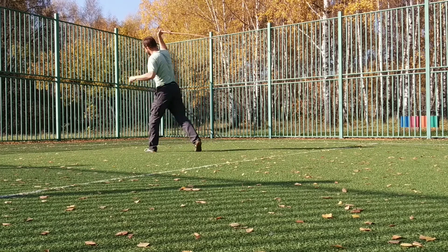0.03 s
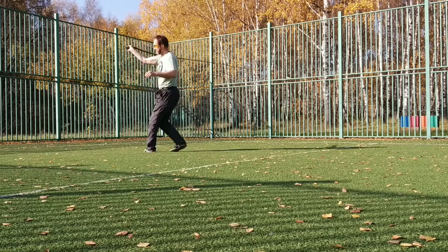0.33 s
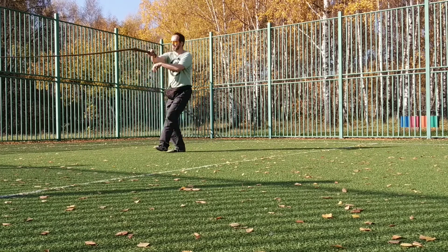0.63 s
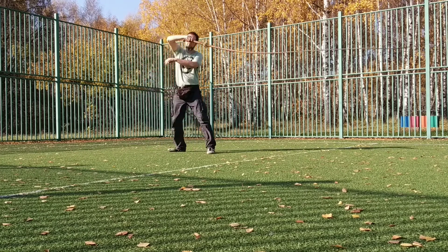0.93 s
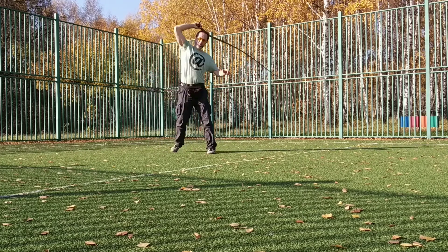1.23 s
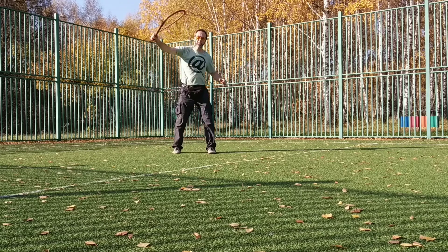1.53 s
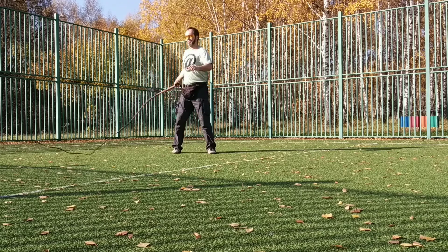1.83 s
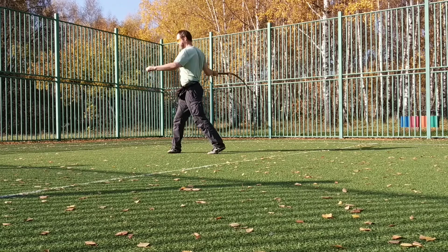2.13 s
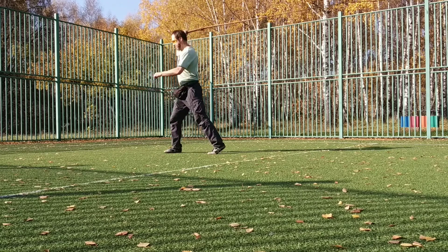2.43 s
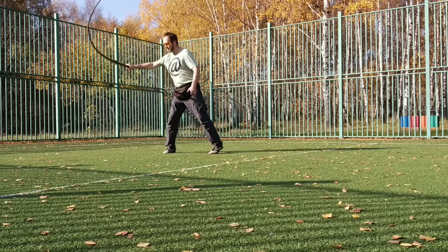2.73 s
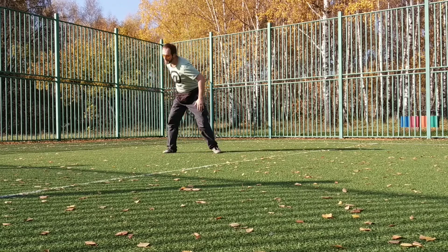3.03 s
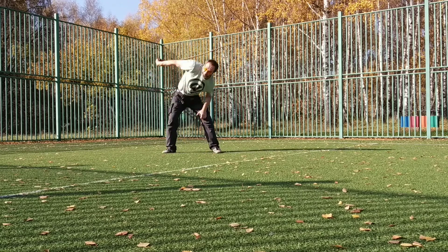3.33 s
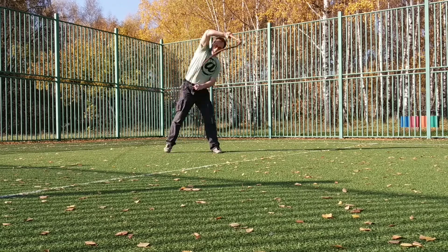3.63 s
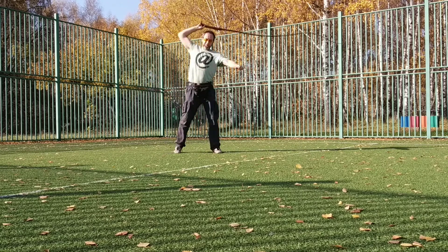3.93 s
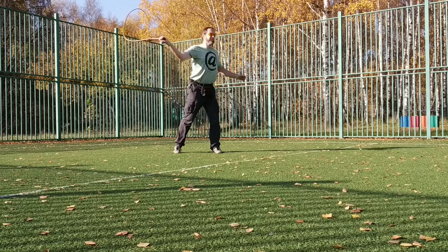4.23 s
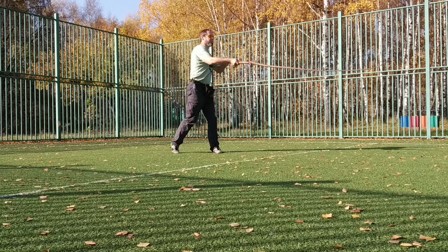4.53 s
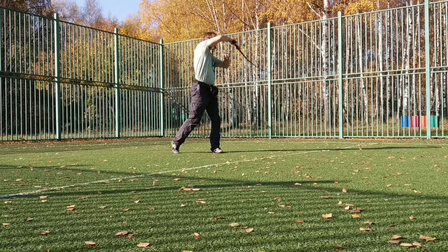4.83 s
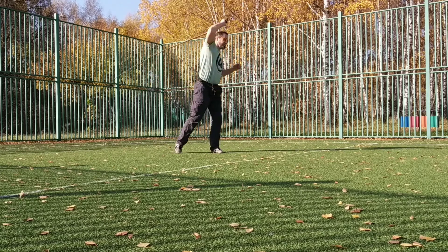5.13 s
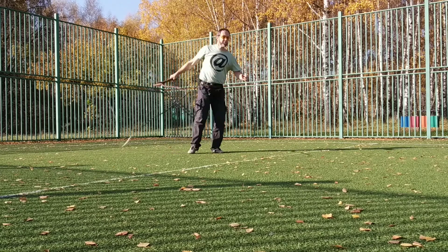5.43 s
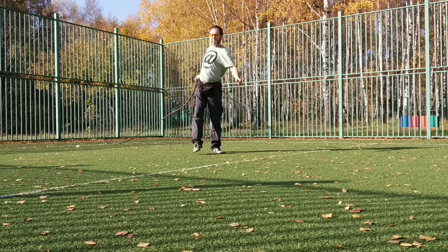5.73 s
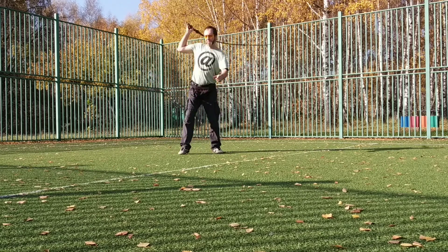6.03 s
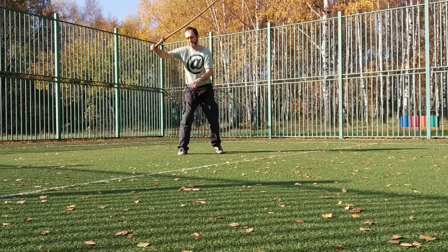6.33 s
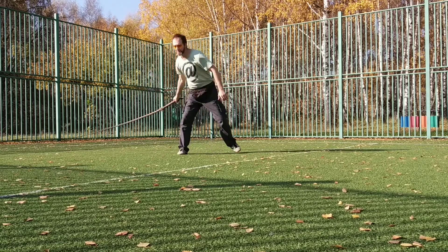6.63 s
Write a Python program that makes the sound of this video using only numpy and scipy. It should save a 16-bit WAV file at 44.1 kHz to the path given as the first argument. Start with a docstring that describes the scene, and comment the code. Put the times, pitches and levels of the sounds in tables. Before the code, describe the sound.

A faint, low rumble of distant traffic runs throughout on an outdoor field. A long leather whip swishes softly, close on the left, around 0.5 and 0.8 seconds. At 1.7 seconds it cracks sharply, overloading the microphone with a slight thud. Quick slaps and brief falling trills come back from a steel fence, and a bright wash fades over about a second. A whoosh with a soft flick passes at 3 seconds, a lighter swish follows, and a second crack lands at 3.6 seconds with a distant echo. Around 4.4 to 4.5 seconds the whip whistles by with two light snaps. The third hard crack comes at 5.4 seconds, again distorting briefly and echoing off the fence. A last hissing whoosh and soft flick at 6.5 seconds trail into a faint swish. A few quiet scuffs on turf fall between the swings.

```python
"""A sports field ringed by steel bars, a town rumbling far off, the near fence about 3.6 m away.
Just left of the microphone a long leather whip is swung. The thong hisses and whistles through the air;
slow throws end in a soft flick, three fast ones in a crack as the tip sheds shock waves.
The bars scatter each crack into slaps, falling trills and a long bright wash; trees answer later.
The hardest blasts overload the microphone."""
import sys
import numpy as np
from scipy import signal
from scipy.fft import rfft, irfft
from scipy.io import wavfile
from scipy.ndimage import uniform_filter1d

SR = 44100
rng = np.random.default_rng(int(sys.argv[2]) if len(sys.argv) > 2 else 0)


def master(y):
    """Save y as 16-bit WAV."""
    cut = np.clip(np.atleast_2d(y).T, -1, 1)
    pcm = np.round(cut * 32767)  # scale
    wavfile.write(sys.argv[1], SR, pcm.astype(np.int16))


N = 303408
TIME = np.arange(N) / SR


def amp(db):
    """Decibels to gain."""
    return 10 ** (np.asarray(db) / 20)


def unit(x):
    """Scales to rms 1."""
    return x / np.sqrt(np.mean(x ** 2) + 1e-20)


def read(points, hz):
    """Reads (freq_hz, value) points on a log-frequency axis."""
    freqs, values = np.transpose(points)
    return np.interp(np.log(hz + 1), np.log(freqs + 1), values)


def pan(side_db):
    """Left and right gains; side_db is left minus right throughout."""
    return amp(np.array([[side_db], [-side_db]]) / 2)


def add(mix, start_s, sound):
    """Mixes a stereo sound in at start_s."""
    part = mix[:, round(start_s * SR):][:, :sound.shape[1]]
    part += sound[:, :part.shape[1]]


def wander(hz, size):
    """Smooth random motion of rms about 1, rolling off above hz."""
    freqs = np.fft.rfftfreq(N, 1 / SR)
    return unit(irfft(rfft(rng.standard_normal(N)) * np.exp(-(freqs / hz) ** 2), N))[:size]


def ripple(size, width):
    """Random bumps of rms 1, smoothed twice over width points."""
    return unit(uniform_filter1d(uniform_filter1d(rng.standard_normal(size), width), width))


def swell(t, rise_s, fall_s):
    """Grows towards t = 0 and dies after it."""
    return np.exp(-np.where(t < 0, -t / rise_s, t / fall_s))


# How much of a left-right level difference the microphone picks up: freq_hz, share
MIC_SHADOW = [(400, 0.015), (1500, 0.28), (2500, 0.073), (4500, 1), (8000, 1), (13000, 0.49)]

def noise(colour, likeness, size, side_db=0):
    """Stereo noise of rms 1 with a given spectrum, left-right likeness and lean to one side."""
    hz = np.fft.rfftfreq(size, 1 / SR)
    left, other = rfft(rng.standard_normal((2, size)))
    same = np.clip(read(likeness, hz), -1, 1)
    right = same * left + np.sqrt(1 - same ** 2) * other
    gain = amp(read(colour, hz)) * pan(side_db) ** read(MIC_SHADOW, hz)
    return unit(irfft(np.array([left, right]) * gain, size))


# Traffic far beyond the field: freq_hz, level_db
TOWN_SPECTRUM = [(18, -9), (40, 2), (52, -6), (65, 3), (85, -7), (150, -12), (280, -23), (750, -25),
                 (1200, -31), (2800, -37.5), (6500, -39), (10500, -46), (16000, -57)]
# How alike it reaches the two sides of the microphone: freq_hz, correlation
TOWN_CORRELATION = [(30, 0.96), (300, 1), (1000, 0.11), (3000, 0.0065)]
# One distant engine: time_s, level_db
ENGINE_LEVELS = [(0.1, -55), (.45, -43.5), (0.86, -36), (1.15, -51), (1.55, -43.5), (2.0, -59),
                 (3.1, -52.5), (3.8, -40.5), (4.1, -49.5), (4.7, -46), (5.6, -43.5), (6.8, -46.5)]

def town(level_db=-36, surge_db=1.2, engine_hz=144.8, climb_hz_per_s=0.75, left_lag_s=0.00026):
    """Far traffic to the right heaves under a steady hiss; an engine drones in and out, gathering speed."""
    bed = noise(TOWN_SPECTRUM, TOWN_CORRELATION, N, side_db=3) * amp(level_db)
    rumble = signal.sosfiltfilt(signal.butter(2, 220, fs=SR, output="sos"), bed)
    pitch_hz = (engine_hz + climb_hz_per_s * TIME) * (1 + 0.004 * wander(5.1, N))
    phase = 2 * np.pi * np.cumsum(pitch_hz) / SR
    drone = unit(np.sin(phase) + amp(-19) * np.sin(2 * phase))
    engine = drone * amp(np.interp(TIME, *np.transpose(ENGINE_LEVELS)))
    heave = rumble * (amp(surge_db * wander(17, N)) - 1)
    left, right = bed + heave + engine
    return np.array([np.roll(left, round(left_lag_s * SR)), right])


# Echoes from far beyond the fence: peak_s, level_db, rise_s, fall_s, centre_hz
DISTANT_ECHOES = [(1.945, -29, 0.1, 0.016, 2740), (3.897, -24.5, 0.045, 0.047, 2600),
                  (3.911, -33.5, 0.036, 0.16, 910), (5.605, -28, .04, 0.026, 2150)]

def far_echoes(grain_db=1.5):
    """Distant walls and trees send each crack back as a dull, grainy swell."""
    out, size = np.zeros((2, N)), 32768
    t = (np.arange(size) - size // 2) / SR
    for s, db, rise, fall, hz in DISTANT_ECHOES:
        colour = [(hz / 6, -24), (hz / 2, -6), (hz, 0), (hz * 2.3, -9), (hz * 4, -40)]
        echo = noise(colour, [(500, 0.34), (2000, 0.088)], size)
        grain = unit(amp(grain_db * wander(200, size)))
        add(out, s + t[0], amp(db) * echo * grain * swell(t, rise, fall))
    return out


# Shoes and thong brushing the turf, centred: peak_s, level_db, rise_s, fall_s, centre_hz
TURF_SCUFFS = [(0.395, -49, 0.015, 0.05, 1610), (1.812, -23, 0.0014, 0.0057, 290),
               (2.084, -36, 0.0055, 0.0085, 377), (3.118, -43, 0.011, 0.019, 740),
               (3.14, -44, 0.006, 0.003, 1400), (4.785, -46, 0.03, 0.028, 2500),
               (6.685, -42, 0.023, 0.024, 910)]

def scuffs(grain_db=3):
    """Blades of turf and dry leaves slip in small clumps."""
    out, size = np.zeros((2, N)), 8192
    t = (np.arange(size) - size // 2) / SR
    for s, db, rise, fall, hz in TURF_SCUFFS:
        colour = [(hz / 4, -14), (hz, 0), (hz * 1.46, -11), (hz * 5, -42)]
        rub = noise(colour, [(300, 0.77), (3000, 0.7)], size)
        grain = unit(amp(grain_db * wander(370, size)))
        add(out, s + t[0], amp(db) * rub * grain * swell(t, rise, fall))
    return out


def trill(length_s, first_hz, last_hz, waver=0.065):
    """Echoes of neighbouring bars merge into a brief ringing tone that sinks as the angle flattens."""
    progress = np.arange(0, length_s, 1 / SR) / length_s
    jitter = unit(uniform_filter1d(rng.standard_normal(4096), 40))[:len(progress)]
    pitch_hz = last_hz + (first_hz - last_hz) * (1 - progress) ** 2
    phase = 2 * np.pi * np.cumsum(pitch_hz * (1 + waver * jitter)) / SR
    return unit(np.sin(phase) + amp(-12) * np.sin(2 * phase)) * np.sin(np.pi * np.sqrt(progress))


def stray_trills(size, count=110):
    """Faint trills from all round the field, scattered through the wash."""
    out = np.zeros((2, size))
    draws = rng.uniform([.04, .012, 0, .75, -12], [.7, .035, 2.6, .92, 12], (count, 5))
    for s, length, octave, sink, side_db in draws:
        hz = 1300 * 2 ** octave
        add(out, s, amp(-19) * pan(side_db) * trill(length, hz, sink * hz))
    return out


# Rows of bars on either side: start_s, length_s, first_hz, last_hz, level_db, side_db
FENCE_TRILLS = [(1.725, 0.018, 2340, 1480, -26, -2), (1.749, 0.052, 2810, 2460, -29.5, 10),
                (1.773, 0.021, 4700, 4340, -22, 1), (1.793, .016, 4700, 3840, -22, -2),
                (3.612, 0.013, 1960, 1750, -24, -6), (3.627, 0.0091, 3110, 2250, -24.5, 5),
                (5.447, 0.014, 3590, 2300, -20.5, 1)]

def fence_trills():
    """The clearest trills off the bars, just after each crack."""
    out = np.zeros((2, N))
    for s, length, first_hz, last_hz, db, side_db in FENCE_TRILLS:
        add(out, s, amp(db) * pan(side_db) * trill(length, first_hz, last_hz))
    return out


SOUND_M_PER_S, NEAR_DELAY_S = 343, 0.021  # the delay is the round trip to the near fence
# Sharp slaps off the fence, near and far: peak_s, level_db, rise_s, fall_s, centre_hz, bass_db, side_db
FENCE_SLAPS = [(1.7455, -16.5, 0.00098, 0.0025, 9500, 6, 8), (1.754, -19.5, 0.0039, 0.028, 3600, -7, 8),
               (1.7635, -19, 0.0076, 0.0042, 10100, 3, 12), (1.7789, -10, 0.00063, 0.0014, 3830, 6, 11),
               (1.8502, -15, 0.0005, 0.007, 7750, -35, 1), (3.6042, -12, 0.002, 0.003, 8000, -4, -6),
               (3.6235, -11, 0.0035, 0.0083, 5340, -8, 13), (3.6245, -9, 0.0011, 0.0028, 11000, -16, 10),
               (3.704, -17, 0.0072, 0.0076, 6000, -9, 0), (5.418, -21, .001, .003, 6000, -8, 2),
               (5.4275, -10.5, 0.00065, 0.0009, 7500, -1, 14),
               (5.4462, -5.5, 0.00044, 0.0032, 4650, -0.5, 4),
               (5.4648, -11.5, 0.00072, 0.00062, 2820, 8, -2)]

def fence_slaps():
    """The fence throws back sharp slaps; a soft near-fence echo also follows every crack."""
    out = np.zeros((2, N))
    for s, *_ in FULL_CRACKS:
        add(out, *shock(s + NEAR_DELAY_S, db=-19, rise_s=0.0042, fall_s=0.022, centre_hz=2170,
                        hump_db=10.5, bass_db=-7, side_db=10))
    for *burst, bass_db, side_db in FENCE_SLAPS:
        add(out, *shock(*burst, hump_db=10.5, bass_db=bass_db, side_db=side_db, octaves=0.65))
    return out


def bars(crack_s, size, count=200, spacing_m=0.127, crooked=0.12, shade_m=5, reach_m=13, uneven_db=4):
    """Evenly spaced bars answer one after another, ever farther off: click trains that fall in pitch."""
    out = np.zeros((2, size))
    slap_paths = [(s - crack_s, 0, -5) for s, *_ in FENCE_SLAPS if 0 < s - crack_s < 0.1]
    for delay_s, db, side_db in [(NEAR_DELAY_S, 3, -12)] + slap_paths:
        distance_m = SOUND_M_PER_S * delay_s / 2
        along_m = spacing_m * (np.arange(count) + crooked * rng.standard_normal((2, count)))
        path_m = np.hypot(distance_m, along_m)
        # near bars shade one another, far ones fade, and no two answer equally
        strength = np.tanh(along_m / shade_m) * np.exp(-(along_m / reach_m) ** 2)
        strength *= amp(uneven_db * rng.standard_normal((2, count)))
        arrival = np.clip(np.round(2 * path_m / SOUND_M_PER_S * SR).astype(int), 0, size - 1)
        clicks = amp(db) * pan(side_db) * strength * distance_m / path_m
        np.add.at(out, (np.arange(2)[:, None], arrival), clicks)
    return out


def comb(echoes, depth_db=1.8):
    """The fronts of one crack interfere, and all its echoes carry the same fine peaks and notches."""
    spectrum = rfft(echoes)
    notches = unit(amp(depth_db * np.minimum(ripple(spectrum.shape[1], 45), 1)))
    return irfft(spectrum * notches, echoes.shape[1])


def wash_level(t, fence_db, delay_s, hold_s, trees_db, fence_db_per_s=74.5, trees_db_per_s=40):
    """The fence answers early, holds and drops fast; the trees behind it swell later and linger."""
    def attack(start_s, length_s):
        return np.clip((t - start_s) / length_s, 0, 1)
    onset_s = 0.0036
    near_fence = amp(-24) * attack(NEAR_DELAY_S - onset_s, onset_s)
    fence = np.maximum(near_fence, attack(delay_s, onset_s))
    fence *= amp(fence_db - fence_db_per_s * np.maximum(t - hold_s, 0))
    trees = attack(NEAR_DELAY_S, 0.44) * amp(trees_db - trees_db_per_s * t)
    return np.hypot(fence, trees)


# The wash at the microphone, colour_age_s after a crack: freq_hz, level_db
WASH_SPECTRUM = [(120, -29), (200, -10), (372, -17.5), (598, -4), (816, -7.5), (894, -0.5), (1180, -11.5),
                 (1630, -2), (2720, 4), (4140, -1.5), (6420, -3.5), (9780, -13), (13100, -34), (15000, -55)]
# How its balance shifts with age: freq_hz, change_db_per_s
WASH_DARKENING = [(200, 4), (900, 25.5), (2700, 22), (5000, 1), (8000, -10), (12000, -37), (16000, -88)]

def wash(crack_s, treble_side_db, colour_age_s=0.4561, drift_db_per_s=10, patchy_db=1.1):
    """Dense echoes of bars and trees at an even level; the air takes the top off as the paths lengthen."""
    size = round(1.4 * SR)
    echoes = bars(crack_s, size)
    echoes += amp(-17 + 0.28 * wander(1600, size)) * rng.standard_normal((2, size))  # diffuse scatter
    echoes /= np.sqrt(uniform_filter1d((echoes ** 2).mean(0), 1500))
    hz, age, spectra = signal.stft(comb(echoes + stray_trills(size)), SR, nperseg=512)
    # long waves reach both sides alike; short ones come mostly from the near fence on the left
    same = read([(300, 1.0), (1000, 0.0074)], hz)[:, None]
    spectra[1] = same * spectra[0] + np.sqrt(1 - same ** 2) * spectra[1]
    spectra *= pan(treble_side_db + drift_db_per_s * age) ** read(MIC_SHADOW, hz)[:, None]
    colour = amp(read(WASH_SPECTRUM, hz)[:, None] + read(WASH_DARKENING, hz)[:, None] * (age - colour_age_s))
    patches = unit(uniform_filter1d(uniform_filter1d(rng.standard_normal(colour.shape), 14, 0), 3, 1))
    spectra *= colour / np.sqrt(np.mean(colour ** 2, 0)) * amp(patchy_db * patches)
    return signal.istft(spectra, SR, nperseg=512)[1][:, :size]


# Cracks that set the whole fence off: start_s, fence_db, delay_s, hold_s, trees_db, treble_side_db
FULL_CRACKS = [(1.7038, -21, 0.084, 0.13, -22.5, 5.5), (3.5867, -17.5, 0.023, 0.16, -16.5, 3.5),
               (5.398, -18, 0.055, 0.2, -15.5, 4)]

def fence_washes(clump_db=1.15):
    """Each crack's wash dies away in clumps: posts and trunks return more than the gaps between them."""
    out = np.zeros((2, N))
    for s, *shape, side_db in FULL_CRACKS:
        tail = wash(s, side_db)
        size = tail.shape[1]
        clumps = amp(clump_db * wander(110, size))
        add(out, s, tail * wash_level(TIME[:size], *shape) * clumps)
    return out


def vortex(hz, breath_db, flutter_hz, waver=0.035):
    """Vortices peel off at a pitch that follows the speed; the taper smears the tone into a band."""
    size = len(hz)
    phase = 2 * np.pi * np.cumsum(hz * (1 + waver * wander(270, size))) / SR
    return unit(np.sin(phase) + amp(breath_db) * wander(flutter_hz, size) * np.cos(phase))


# The thong and its thin end turning over: middle_s, length_s, pitch_hz, glide_octaves_per_s, level_db
THONG_WHISTLES = [(0.853, 0.11, 958, -7, -51), (1.61, 0.052, 1093, -1, -48), (1.633, 0.05, 467, 4.5, -46.5),
                  (2.943, 0.04, 441, 2, -36.5), (3.322, 0.038, 967, 9, -50), (3.355, 0.014, 2200, -14, -47),
                  (3.591, 0.012, 4270, 94, -28), (4.379, .018, 1370, 8, -38),
                  (4.379, 0.021, 1690, 22, -34.5), (4.393, 0.015, 1600, -8, -33),
                  (4.421, 0.028, 650, 11, -37), (4.468, 0.026, 655, -8, -30.5),
                  (4.532, 0.0232, 510, -5, -36), (4.48, 0.041, 1137, -14.5, -42),
                  (4.549, 0.012, 1490, -7, -27.5), (4.569, 0.035, 1344, -5.5, -42.5),
                  (5.381, 0.014, 2560, 25, -28), (6.496, 0.03, 1750, 9, -41), (6.512, 0.011, 1450, 54, -29),
                  (6.494, 0.057, 455, 9, -42), (6.522, 0.014, 2080, 7, -35), (6.597, 0.14, 433, -2, -44)]

def whistles(side_db=5):
    """Brief, breathy vortex tones on the left, gliding as the whip gains or loses speed."""
    out = np.zeros((2, N))
    for s, length, hz, glide, db in THONG_WHISTLES:
        t = np.arange(-length / 2, length / 2, 1 / SR)
        tone = vortex(hz * 2 ** (glide * t), breath_db=-8, flutter_hz=284)
        add(out, s + t[0], amp(db) * tone * np.sqrt(np.hanning(len(t))) * pan(side_db))
    return out


# Air round the thin tip: freq_hz, level_db
TIP_HISS = [(200, -25), (1200, -5), (2700, -5.5), (4200, -1), (7000, 4), (9500, 2.5), (11500, -2),
            (13000, -14), (15700, -9)]
# Air round the thick thong: freq_hz, level_db
THONG_RUSH = [(100, 7.5), (500, 5.5), (1000, 1.9), (3000, -10), (8000, -49)]
# Passes left of the microphone: peak_s, hiss_db, rise_s, fall_s, rush_over_hiss_db, hum_hz
THONG_PASSES = [(.48, -52, 0.28, 0.095, -1, 493), (.805, -42.5, 0.12, 0.06, -3.5, 561),
                (1.385, -51.5, 0.038, 0.033, 9.5, 786), (2.925, -44, 0.066, .026, -10, 434),
                (2.967, -37.5, 0.023, 0.025, 1, 461), (3.134, -55.5, 0.09, 0.12, -1, 600),
                (3.351, -40.5, 0.029, 0.015, -3.5, 514), (4.437, -30, 0.034, 0.0033, -6.5, 726),
                (4.488, -32, 0.0246, 0.052, -0.5, 600), (6.525, -26, 0.026, 0.017, -4.5, 614),
                (6.572, -38, 0.023, 0.016, -4.5, 453), (6.714, -42, 0.055, 0.051, -6, 760)]

def swishes(side_db=9.5, linger_db=-26.5, linger_s=0.4, hum_lead_s=0.016, db_per_octave=25.5):
    """Turbulence: the tip hisses, the thick thong rushes lower down and hums higher the faster it goes."""
    hiss = noise(TIP_HISS, [(2000, 0.024)], N) * amp(wander(76, N))
    rush = noise(THONG_RUSH, [(300, 0.82), (2000, 0.14)], N) * amp(0.5 * wander(47, N))
    # one more pass as the loop races towards each crack
    run_ups = [(s - 0.0091, -31, 0.0245, 0.0089, -11, 544) for s, *_ in FULL_CRACKS]
    out, t = np.zeros((2, N)), np.arange(-SR // 3, SR // 3) / SR
    for s, db, rise, fall, rush_db, top_hz in list(THONG_PASSES) + run_ups:
        field_return = amp(linger_db) * swell(TIME - s, rise, linger_s)
        level = swell(TIME - s, rise, fall) + field_return
        out += amp(db) * level * (hiss * pan(side_db) + amp(rush_db) * rush)
        effort = swell(t, rise, fall)
        pitch_hz = top_hz * 2 ** (20 * np.log10(effort + 1e-9) / db_per_octave)
        hum = vortex(pitch_hz, breath_db=-10, flutter_hz=130)
        hum_db = db + rush_db - 6 + 0.13 * (db + 25)  # slow passes barely hum
        # the hum comes first: the wave runs through the thick thong before it reaches the tip
        add(out, s - hum_lead_s + t[0], amp(hum_db) * effort * hum * pan(0.83))
    return out


# The loop rolling out near the microphone: middle_s, peak_db, half_width_s, side_db
TIP_FLICKS = [(1.7056, -1, 0.00028, -11), (2.977, -18.5, 0.00043, 2.5), (3.5868, -17.5, 0.00073, -7),
              (4.4404, -18.5, 0.00053, -11.5), (4.5095, -16.5, 0.00036, 2), (6.5234, -20.5, 0.0015, 0),
              (6.5448, -14, 0.00063, 3)]

def flicks():
    """The turning tip pushes and pulls the air once: one pressure wave, in soft throws and cracks alike."""
    out = np.zeros((2, N))
    for s, db, half_width, side_db in TIP_FLICKS:
        offset = (TIME - s) / half_width
        out += amp(db) * pan(side_db) * 3 * offset / (1 + offset ** 2) ** 2
    return out


# Base colour of a shock at the microphone: freq_hz, level_db
SHOCK_SPECTRUM = [(60, -37), (250, 5), (1000, 2.5), (3000, -0.5), (7500, -4), (11000, -5), (16000, -15.5)]

def shock(s, db, rise_s, fall_s, centre_hz, hump_db, bass_db, side_db, octaves=0.56, ragged_db=2.5):
    """A brief burst of ragged pressure, lifted around centre_hz; returns its start time and sound."""
    size = 4096
    t = (np.arange(size) - size // 4) / SR
    hz = np.geomspace(40, 18000, 60)
    hump = np.exp(-(np.log2((hz + 1) / centre_hz) / octaves) ** 2)
    colour = read(SHOCK_SPECTRUM, hz) + hump_db * hump + bass_db / (1 + (hz / 1300) ** 2)
    burst = noise(np.transpose([hz, colour]), [(500, 0.61), (2000, 0.044)], size, side_db)
    fronts = amp(ragged_db * ripple(size, 16))
    level = swell(t, rise_s, fall_s)
    return s + t[0], amp(db) * unit(burst * fronts * level) * np.sqrt(np.mean(level ** 2))


# Direct sound of the tip: peak_s, level_db, rise_s, fall_s, centre_hz, hump_db, bass_db
TIP_SHOCKS = [(1.6945, -5, 0.0002, 0.0022, 10700, 10, -20), (1.7053, -1, 0.00088, 0.0025, 3020, 5.5, 2),
              (3.5854, -5, 0.0045, 0.0026, 5170, 6.5, -21), (4.4397, -8.5, 0.00057, 0.00072, 9900, 12, -36),
              (4.509, -20, 0.0006, 0.0036, 8100, 12, 2), (5.379, -20.5, 0.0033, 0.01, 2420, 8, -14),
              (5.392, -10, 0.0018, 0.0048, 10500, 1, -6.5), (5.3955, 0.5, 0.00025, 0.0011, 910, 5, -1.5)]

def cracks():
    """The tip sheds shock waves that reach the microphone straight from the left."""
    out = np.zeros((2, N))
    for row in TIP_SHOCKS:
        add(out, *shock(*row, side_db=6))
    return out


# Blasts that knock the microphone off its rest point: start_s, left_full_scale, right_full_scale
MIC_JOLTS = [(1.7051, 0.38, -0.9), (1.7774, 0.27, -0.17), (5.3959, -0.71, -0.63), (5.445, -0.23, -0.12),
             (5.4648, 0.083, -0.33)]

def jolts(rise_s=0.00016, settle_s=0.15, swing_hz=3.09, lead_rad=0.49):
    """The overloaded microphone jumps with a thud and swings slowly back to rest."""
    out, t = np.zeros((2, N)), np.arange(SR) / SR
    jump = (1 - np.exp(-t / rise_s)) * np.exp(-t / settle_s)
    swing = np.cos(2 * np.pi * swing_hz * t + lead_rad) / np.cos(lead_rad)
    for s, left, right in MIC_JOLTS:
        add(out, s, np.array([[left], [right]]) * jump * swing)
    return out


def scene():
    """The field as it reaches the microphone: whip, fence, turf and town."""
    whip = swishes() + whistles() + flicks() + cracks()
    return whip + fence_slaps() + fence_trills() + far_echoes() + scuffs() + town() + fence_washes()


def record(dry, edge_hz=15850):
    """The microphone jolts, clips at full scale and loses the treble above edge_hz."""
    clipped = np.clip(dry + jolts(), -1, 1)
    lowpass = signal.firwin(511, edge_hz, window=("kaiser", 9), fs=SR)
    return signal.oaconvolve(clipped, lowpass[None], "same")


dry = scene()
out = record(dry)
master(out)
```